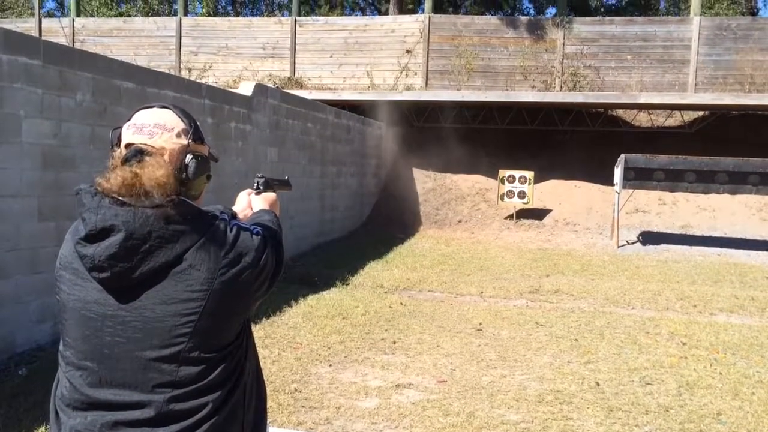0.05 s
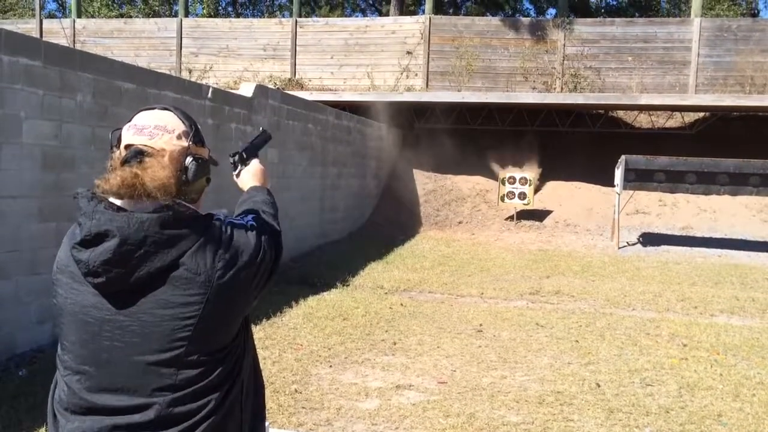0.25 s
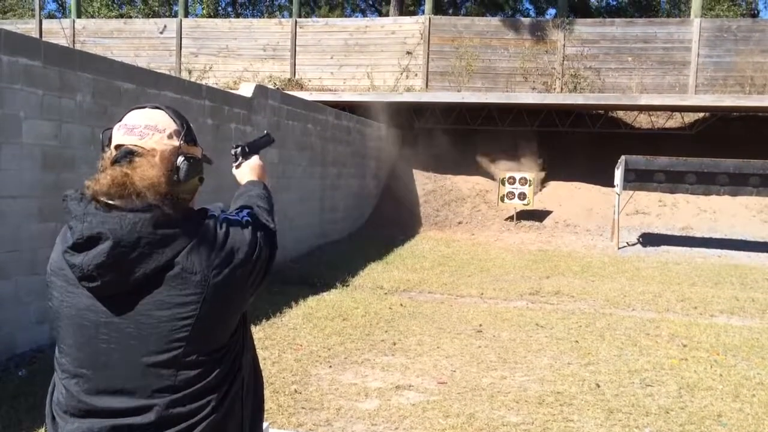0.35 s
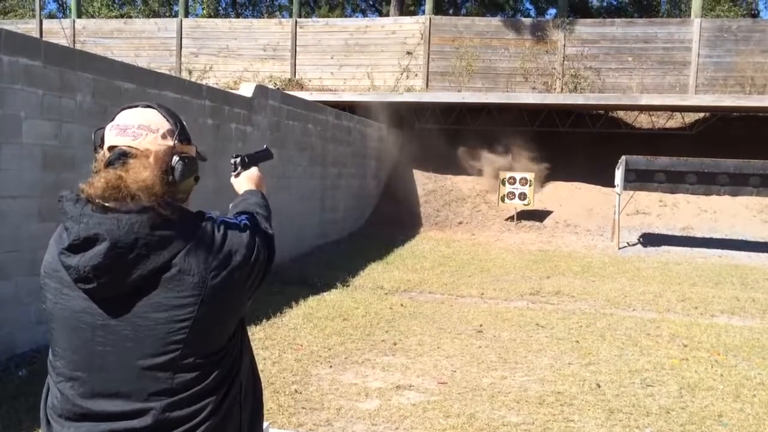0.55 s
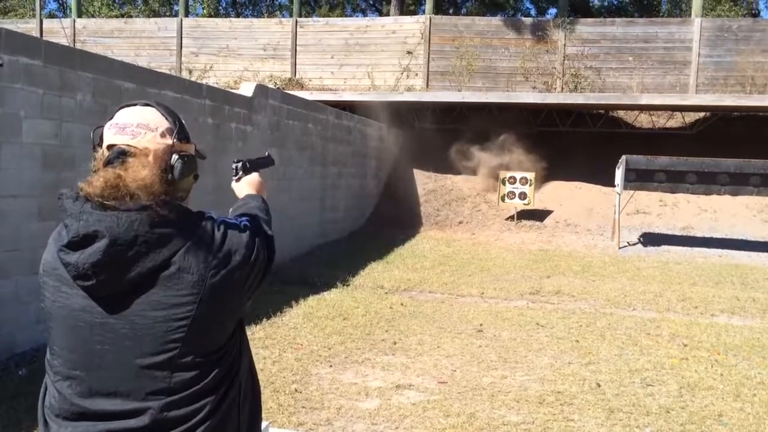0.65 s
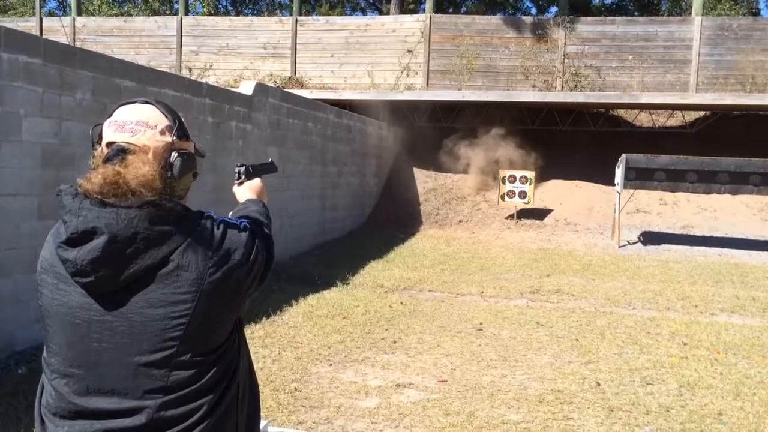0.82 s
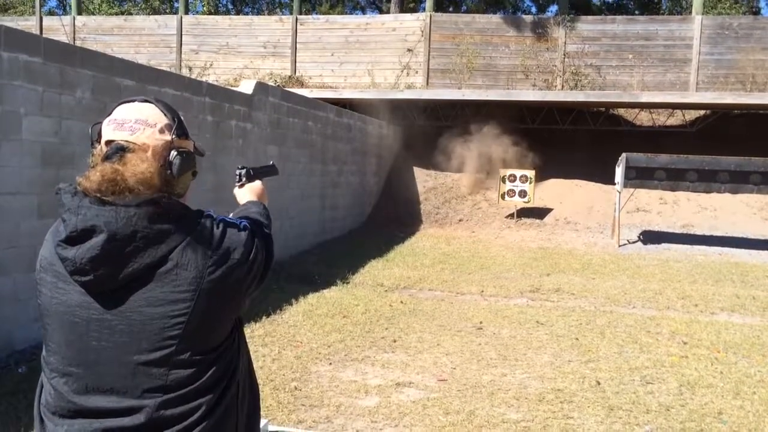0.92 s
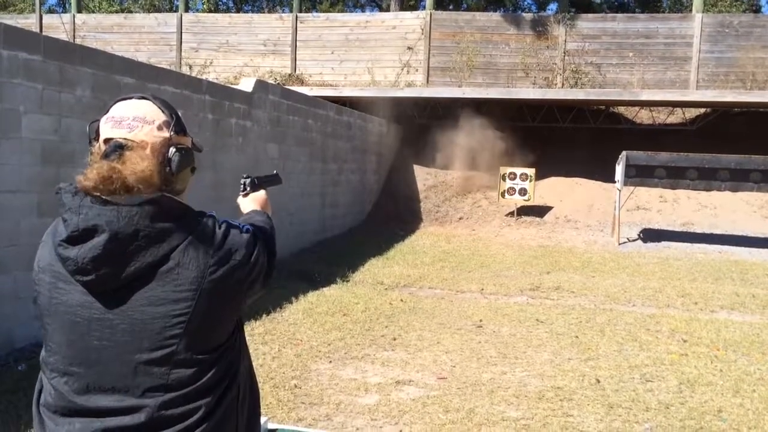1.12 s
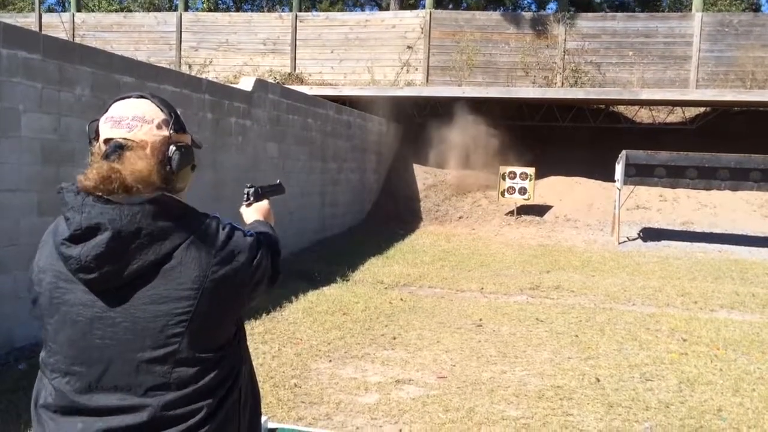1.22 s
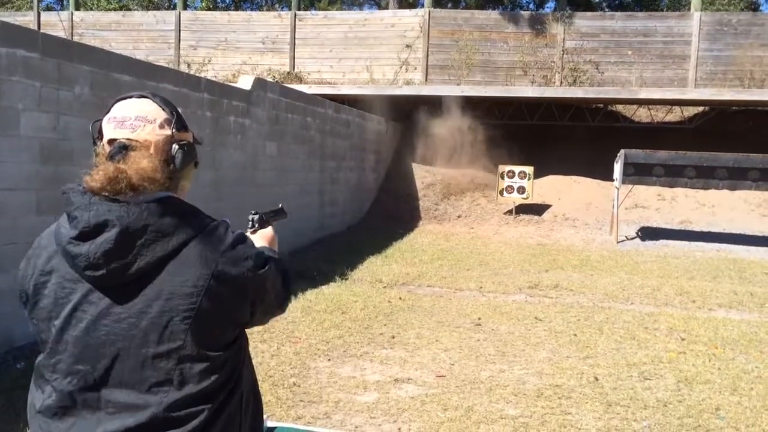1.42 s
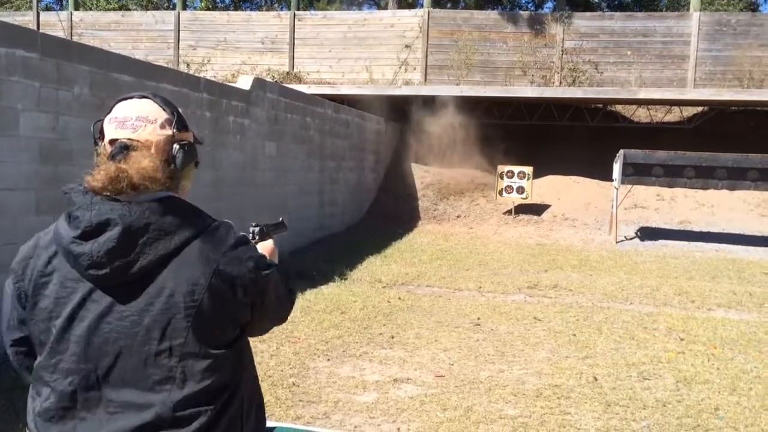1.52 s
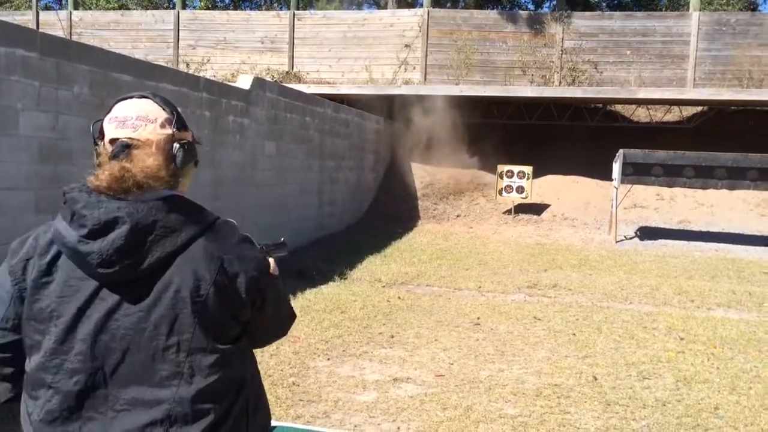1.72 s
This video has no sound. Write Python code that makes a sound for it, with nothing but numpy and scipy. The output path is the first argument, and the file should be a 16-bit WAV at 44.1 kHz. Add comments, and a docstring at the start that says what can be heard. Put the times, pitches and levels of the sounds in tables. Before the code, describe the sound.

A single handgun shot fires almost at once, very loud and harsh, a few steps from the microphone; quick wall slaps and a hollow boom follow, then a distant low roll fades into faint breeze.

```python
"""One handgun shot in a walled bay of an outdoor range, a few steps from the microphone.
A breeze of filtered noise is there from the start; a faint hammer click comes just before the shot.
The blast is a sharp pressure pulse and a harsh noise crackle. Noise puffs are its echoes off walls and roof,
noise bands and wavering tones make the bay boom, and a low roll of noise follows from far away.
The recorder's gain ducks and creeps back, so the breeze returns; the spent case lands with a tick."""
import sys
import numpy as np
from scipy.fft import rfft, irfft, next_fast_len
from scipy.io import wavfile
from scipy.ndimage import uniform_filter1d, map_coordinates

SR = 44100
rng = np.random.default_rng(int(sys.argv[2]) if len(sys.argv) > 2 else 0)


def store_wav(level_fs):
    """Save 16-bit WAV to argv[1]."""
    pcm = np.round(np.clip(np.atleast_2d(level_fs), -1, 1) * 32767)
    wavfile.write(sys.argv[1], SR, pcm.T.astype(np.int16))


N = 77175  # length in samples, 1.75 s
SHOT_S = 0.2262  # when the shot goes off


def amp(db):
    """Turn decibels into a gain."""
    return 10 ** (np.asarray(db) / 20)


def unit(x):
    """Scale a sound to rms 1."""
    return x / np.sqrt(np.mean(x ** 2) + 1e-20)


def since(s):
    """Seconds since time s, for each sample (negative before it)."""
    return np.arange(N) / SR - s


def wobble(rate):
    """A smooth random curve through `rate` random points a second."""
    points = rng.standard_normal(400)
    return map_coordinates(points, [np.arange(N) * rate / SR], mode="wrap")


def filtered(x, response):
    """Multiply the spectrum of x by a gain that depends on frequency."""
    m = next_fast_len(N + 8192)  # spare room so the end does not wrap onto the start
    hz = np.fft.rfftfreq(m, 1 / SR) + 1  # 1 Hz up, to keep clear of zero
    return irfft(rfft(x, m) * response(hz), m)[:N]


def noise(response):
    """Random noise of rms 1, shaped by a gain that depends on frequency."""
    return unit(filtered(rng.standard_normal(N), response))


def coloured(points):
    """Noise of rms 1 whose spectrum joins up (Hz, dB) points."""
    f, db = np.transpose(points)
    return noise(lambda hz: amp(np.interp(np.log(hz), np.log(f), db)))


def die_away(seconds, t60):
    """Exponential fade that starts at 0 s and drops 60 dB every t60 seconds."""
    return np.exp(-np.log(1000) * np.maximum(seconds, 0) / t60)


def envelope(s, rise, t60, hold=0):
    """Straight rise from time s, a hold, then an exponential fade."""
    t = since(s)
    return np.clip(t / rise, 0, 1) * die_away(t - rise - hold, t60)


def swell(fullest, db_per_s, t60):
    """Level that slopes by db_per_s until `fullest` seconds after the shot, then dies away."""
    t = since(SHOT_S + fullest)
    return amp(db_per_s * np.minimum(t, 0)) * die_away(t, t60)


def burst(s, db, hz, t60, octaves, rise):
    """A short puff of noise around one frequency."""
    puff = noise(lambda f: (1 + (np.log2(f / hz) / octaves) ** 2) ** -3)
    return amp(db) * envelope(s, rise, t60) * puff


FRONT_DB, FRONT_S, FRONT_DELAY_S = 20.5, 0.0004, 0.0051  # peak, length of push, wait after SHOT_S


def pressure_front():
    """The air is pushed hard at once, then swings below rest and settles."""
    u = np.maximum(since(SHOT_S + FRONT_DELAY_S), 0) / FRONT_S
    return amp(FRONT_DB) * (u > 0) * (1 - u) * np.exp(-u)


# Colour of the blast. Each row: frequency in Hz, relative strength in dB.
BLAST_COLOUR = [(60, -15), (200, -11), (550, 1.5), (1100, -2), (3000, -0.5), (5000, -3.5), (11000, -5),
                (15500, -0.5)]
BLAST_DB, BLAST_RISE_S, BLAST_HOLD_S, BLAST_T60_S = 13, 0.0049, 0.018, 0.058


def blast_crackle():
    """Dense crackle of the muzzle blast off the ground and the near wall, as a burst of noise."""
    shape = envelope(SHOT_S, BLAST_RISE_S, BLAST_T60_S, BLAST_HOLD_S)
    return amp(BLAST_DB) * shape * coloured(BLAST_COLOUR)


# The bay's crowded reflections, band by band. Each row: centre in Hz, level in dB at the turning point,
# turning point in seconds after the shot, slope before it in dB per second, then time to fall 60 dB in seconds.
BAY_BANDS = [(65, -9.5, 0.077, -11.5, 1.12), (140.7, 1, 0.2, 58, 0.83), (269, 6, .22, 56, 0.69),
             (527, 6.5, 0.19, 8.5, 0.64), (1055, 4.5, .18, -16, 0.58), (2177, 8.5, 0.083, 23, 0.65),
             (4260, 0, 0.095, 14, 0.56), (8520, -3.5, 0.085, 4, 0.4), (13200, -9.5, .07, 4.5, .37)]
GRAIN_DB, GRAIN_RATE = 1.22, 170  # size of the level flicker, its random points per second


def bay_wash():
    """Countless reflections blur into noise; each band slopes and dies at its own pace."""
    centres = np.log([row[0] for row in BAY_BANDS])
    wash = np.zeros(N)
    # each band's share of the power is 1 at its own centre and 0 at the others
    for share, (_, db, fullest, swell_db, t60) in zip(np.eye(len(BAY_BANDS)), BAY_BANDS):
        def response(hz):
            even_per_octave = np.sqrt(np.interp(np.log(hz), centres, share) / hz)
            return even_per_octave / (1 + (48 / hz) ** 4)  # thins out below 48 Hz
        wash += amp(db) * swell(fullest, swell_db, t60) * noise(response)
    return wash * amp(GRAIN_DB * wobble(GRAIN_RATE))


# Standing waves between the walls. Each row: frequency in Hz, level in dB when fullest,
# fullest at this many seconds after the shot, time to fall 60 dB in seconds.
STANDING_WAVES = [(129.7, -3, 0.24, 0.66), (177.1, -1, 0.17, 0.84), (216, -6, 0.3, 0.88),
                  (297.6, 3, 0.24, 0.6), (347.6, -5, .22, 0.8), (538, 2, 0.095, 0.57)]
STANDING_SWELL_DB_PER_S, PHASE_POINTS_PER_S = 134, 6


def standing_waves():
    """Tones that build up between the walls and ring on, their phase drifting at random."""
    ringing = np.zeros(N)
    for hz, db, fullest, t60 in STANDING_WAVES:
        phase = 2 * np.pi * hz * since(SHOT_S) + wobble(PHASE_POINTS_PER_S)
        tone = np.sqrt(2) * np.sin(phase)  # rms 1
        ringing += amp(db) * swell(fullest, STANDING_SWELL_DB_PER_S, t60) * tone
    return ringing


def bay():
    """The boom of the bay: blurred reflections and standing waves, let in over 20 ms."""
    return (bay_wash() + standing_waves()) * np.clip(since(SHOT_S) / 0.02, 0, 1)


# Single echoes off wall, roof, berm and far buildings. Each row: start in seconds, level in dB,
# centre in Hz, time to fall 60 dB in seconds, width in octaves.
ECHO_LIST = [(0.237, 14.5, 2400, 0.067, 1.4), (0.244, 17, 520, 0.077, 0.48), (.262, 1.5, 110, 0.16, 2.2),
             (0.279, 3, 10400, 0.087, 1.26), (0.294, 8, 2580, 0.074, 2.3), (0.326, 11.5, 568, 0.17, 0.95),
             (0.338, 11.5, 1650, 0.1, 0.52), (0.403, 5.5, 1970, 0.19, 1.5), (0.41, -9.5, 6530, 0.29, 0.74),
             (.425, 7.5, 230, 0.15, 1.9), (0.446, 9.5, 557, .15, 1.15), (.5, -18, 4800, 0.13, 1),
             (0.601, -7, 606, 0.102, 1.1), (0.675, -8.5, 480, .16, 1.05), (0.689, -14, 76, 0.084, 0.77),
             (.895, -20, 189, 0.38, 0.34), (0.974, -24.5, 177, 0.36, 0.3), (1.042, -30.5, 380, 0.15, 1.3),
             (1.094, -37, 87, 0.11, 1.4), (1.149, -28, 530, 0.058, 0.52), (1.204, -42.5, 640, 0.11, 1.7),
             (1.27, -41.5, 345, 0.21, 0.24)]


def echoes():
    """Distinct slaps, each a puff of noise at its own moment."""
    return sum(burst(*row, rise=0.0034) for row in ECHO_LIST)


# Colour of the roll from the far tree line. Each row: frequency in Hz, relative strength in dB.
ROLL_COLOUR = [(30, -32.5), (70, -25.5), (180, -1), (330, -1.5), (580, -4), (850, -16.5), (2200, -18.5),
               (4000, -50.5), (9000, -62)]
ROLL_S, ROLL_DB, ROLL_RISE_S, ROLL_T60_S = 0.55, -18, 0.11, 1.81
FLUTTER_DB, FLUTTER_RATE = 2, 45  # size of the unevenness, its random points per second
ROLL_BASS_HZ, ROLL_BASS_ENDS_S, ROLL_BASS_T60_S = 266, 1.14, 0.18


def far_roll():
    """Uneven low noise from far away, whose bass gives out first."""
    roll = coloured(ROLL_COLOUR) * amp(FLUTTER_DB * wobble(FLUTTER_RATE))
    bass = filtered(roll, lambda hz: 1 / (1 + (hz / ROLL_BASS_HZ) ** 4))
    bass_left = die_away(since(ROLL_BASS_ENDS_S), ROLL_BASS_T60_S)
    thinning = roll - bass + bass * bass_left
    return amp(ROLL_DB) * thinning * envelope(ROLL_S, ROLL_RISE_S, ROLL_T60_S)


# Small metal contacts: the hammer falls, then the case lands. Each row: start in seconds, level in dB,
# centre in Hz, time to fall 60 dB in seconds, width in octaves.
METAL_TICKS = [(0.215, -31, 1630, 0.095, 1.5), (1.2027, -42, 15000, .012, 1)]


def ticks():
    """Faint clicks of the hammer and the spent case, as very quick puffs of noise."""
    return sum(burst(*row, rise=0.0005) for row in METAL_TICKS)


# Colour of the breeze in the trees. Each row: frequency in Hz, relative strength in dB.
BREEZE_COLOUR = [(25, -29), (60, -18), (200, -7), (350, -10.5), (550, -5), (1000, -8.5), (1500, -8),
                 (2400, -16), (2900, -19), (5700, -23), (10000, -29), (15500, -40)]
BREEZE_DB, BREEZE_GROWS_DB_PER_S, BREEZE_FULL_S = -48, 3, 1.0  # start level, growth, end of growth


def breeze():
    """Rustle of the trees: noise that grows a little at first and wavers slightly."""
    growth_db = BREEZE_GROWS_DB_PER_S * np.minimum(since(0), BREEZE_FULL_S)
    return coloured(BREEZE_COLOUR) * amp(BREEZE_DB + growth_db + 0.4 * wobble(6.5))


# Strength of the wind on the microphone over time. Each row: time in seconds, level in dB.
WIND_LEVEL = [(0, -46), (.12, -54.5), (.18, -45.5), (.25, -34), (1.2, -50.5), (1.75, -61)]
# Colour of that wind. Each row: frequency in Hz, relative strength in dB.
WIND_COLOUR = [(25, -32.5), (65, -0.5), (140, -1.5), (300, -35), (1000, -71)]


def wind_on_microphone():
    """Soft low lumps of wind pushing on the microphone, as noise of changing level."""
    wind_db = np.interp(since(0), *np.transpose(WIND_LEVEL))
    return coloured(WIND_COLOUR) * amp(wind_db + 2 * wobble(15))


def scene():
    """Everything that reaches the microphone."""
    shot = pressure_front() + blast_crackle()
    reflections = bay() + echoes() + far_roll()
    return (shot + reflections + ticks() + breeze() + wind_on_microphone())[None]


LIMIT_DB, SENSE_S, RECOVER_DB_PER_S = -9, 0.014, 28.5  # gain control: threshold, averaging, recovery
CEILING, TOP_HZ = 0.5, 15750  # level where peaks round off, top of the band


def record(dry):
    """Gain control ducks at once and recovers slowly; peaks are rounded off; the band is limited."""
    power = np.abs(uniform_filter1d(dry[0] ** 2, max(int(SENSE_S * SR), 1)))
    excess_db = np.maximum(10 * np.log10(power + 1e-12) - LIMIT_DB, 0)
    recovery_db = RECOVER_DB_PER_S * since(0)
    # the deepest duck so far, minus what has been recovered since
    duck_db = np.maximum.accumulate(excess_db + recovery_db) - recovery_db
    x = dry[0] * amp(-duck_db)
    rounded = x / (1 + (x / CEILING) ** 6) ** (1 / 6)
    return filtered(rounded, lambda hz: 1 / (1 + (hz / TOP_HZ) ** 120))[None]


dry = scene()
out = record(dry)
store_wav(out)
```